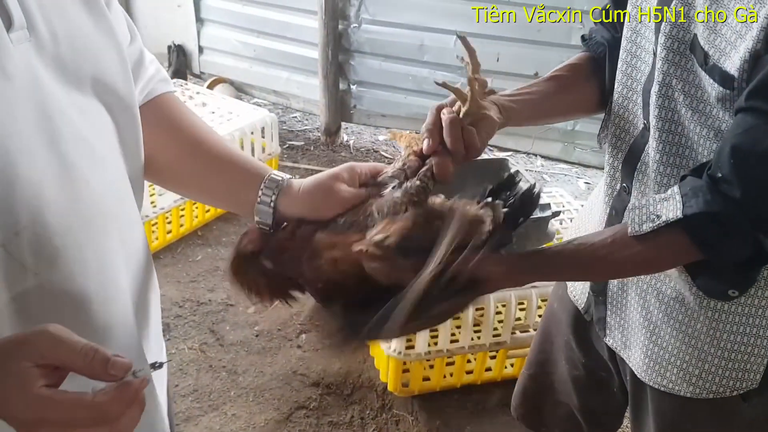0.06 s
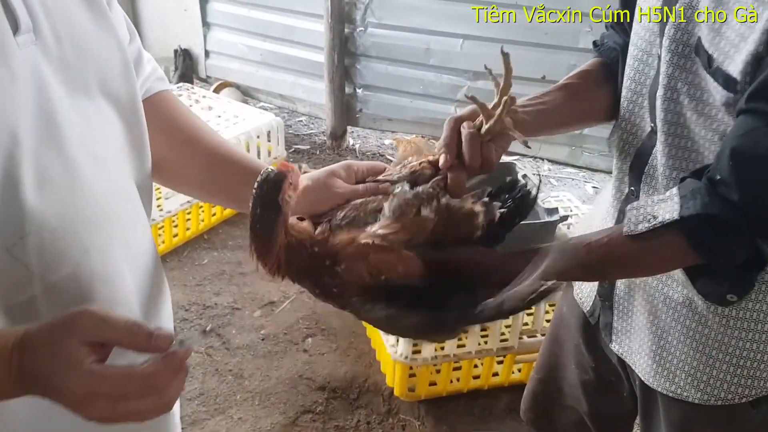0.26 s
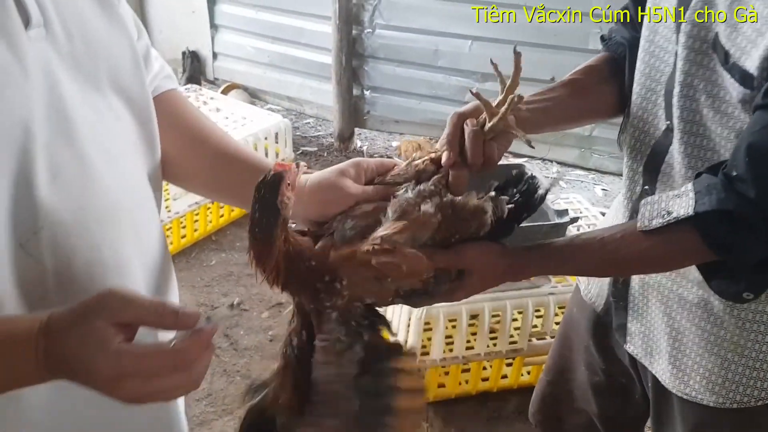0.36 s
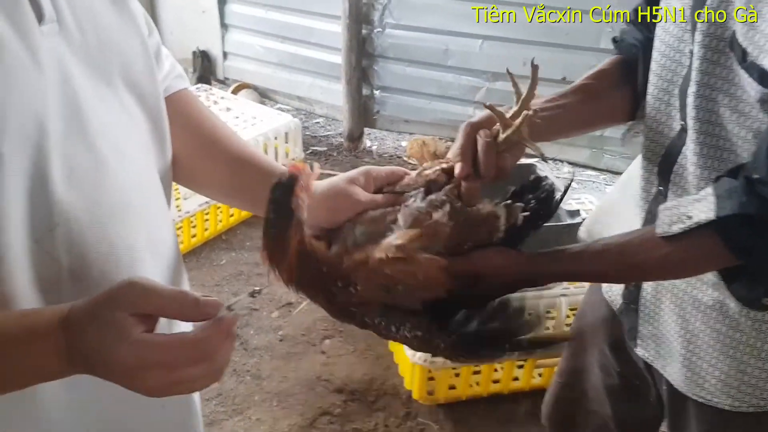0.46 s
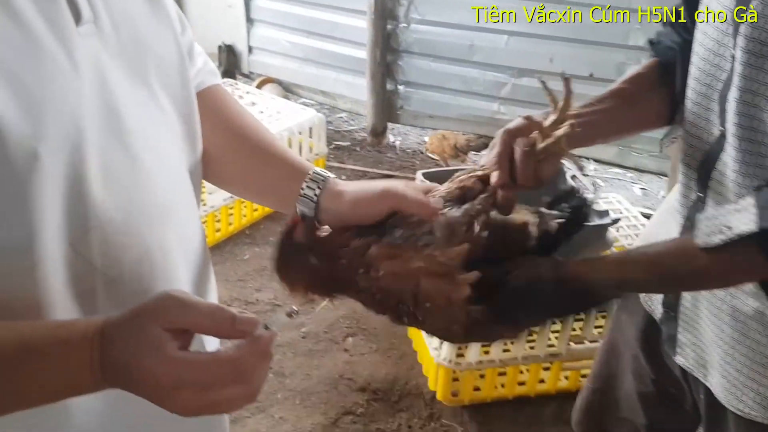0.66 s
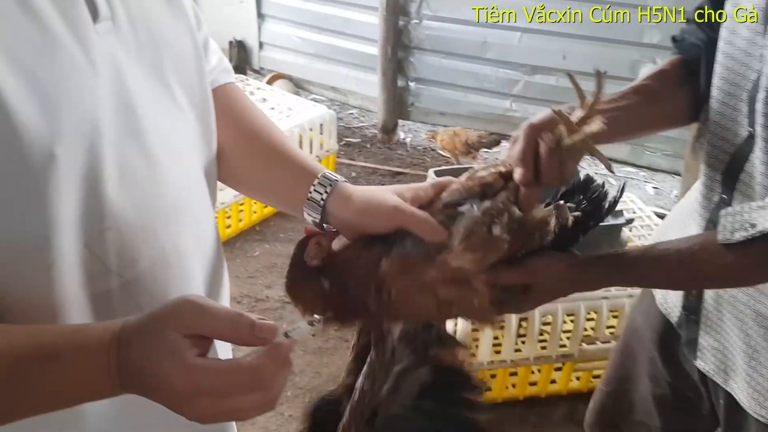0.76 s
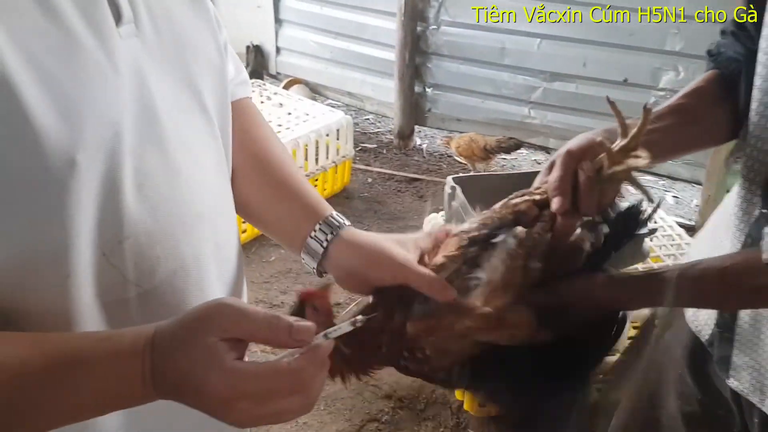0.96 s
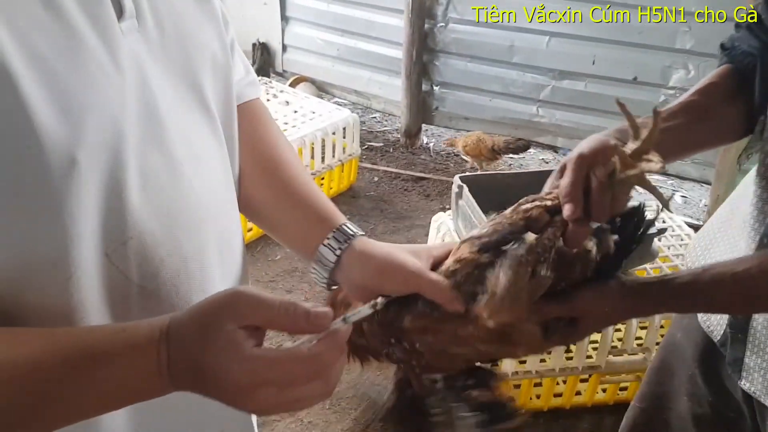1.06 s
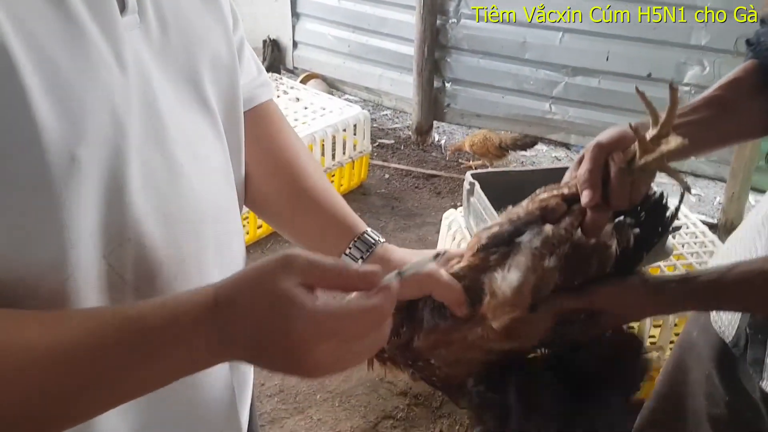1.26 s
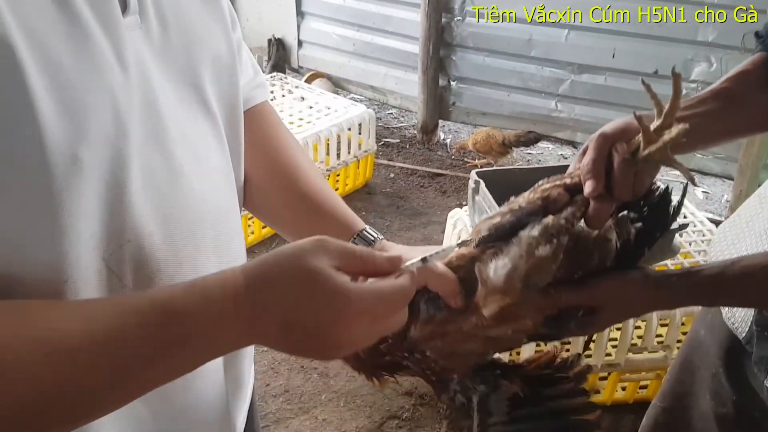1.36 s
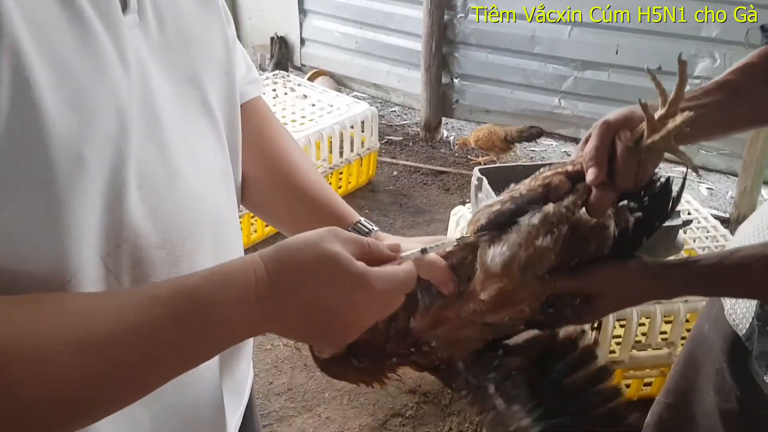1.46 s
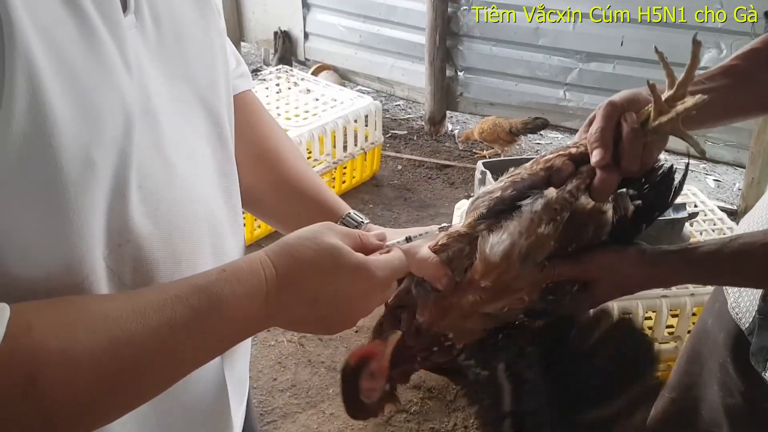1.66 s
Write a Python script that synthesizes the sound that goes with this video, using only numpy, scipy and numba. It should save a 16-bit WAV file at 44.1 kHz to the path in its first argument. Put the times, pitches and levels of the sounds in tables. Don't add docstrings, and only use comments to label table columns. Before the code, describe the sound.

Two harsh, raspy squawks from a restrained hen, with feather flutter and a soft closing cluck

```python
import sys
import numpy as np
from scipy import signal
from scipy.fft import rfft, irfft, next_fast_len
from scipy.io import wavfile
from scipy.ndimage import uniform_filter1d, map_coordinates
from numba import njit

SR = 44100
rng = np.random.default_rng(int(sys.argv[2]) if len(sys.argv) > 2 else 0)


def to_wav(s):
    ch = np.atleast_2d(s).T
    pcm = np.round(np.clip(ch, -1, 1) * 32767)
    wavfile.write(sys.argv[1], SR, pcm.astype(np.int16))


def makeup_ratio(level_db):
    decades = np.asarray(level_db, float) / 20
    return 10 ** decades


N = 74970

# (frequency [Hz], level [dB per Hz])
FAN_RUMBLE = [(21, -36), (35, -5.5), (123, 0.5), (155, -8.5), (188, -3), (217, -13.5), (280, -16),
              (500, -37.5), (650, -69), (1100, -120)]
STEADY_HISS = [(400, -8), (600, -19), (1000, -18), (2000, -18), (3500, -25.5), (5000, -24.5), (8000, -27),
               (16000, -27.5)]
# (frequency [Hz], level [dB per Hz])
INSECT_SONG = [(8000, -26), (8800, -5.5), (9300, 0.5), (10000, -6), (10800, -24.5), (12000, -80.5)]
# (time [s], change of hiss [dB])
FLOCK_SETTLES = [(1.27, 4.5), (1.4, -6), (1.47, -6), (1.52, -1), (1.58, -5.5)]
RUMBLE_DB, HISS_DB, INSECT_DB, LEFT_HISS_DB = -49, -66, -70.5, 1.5

# (time [s], length [s], pitch [Hz], level [dB])
FAR_WHINES = [
    (0, 0.1, 1271, -52),
    (0.115, 0.07, 1247, -65),
    (0.722, 0.072, 1253, -60.5),
    (.785, 0.028, 1400, -61),
    (0.085, 0.039, 1900, -49),
]
# (level over the first [dB]), then (roughness [0-1])
FAR_SECOND_PARTIAL_DB = [0, 3.5, 9.5, 12, -3]
FAR_ROUGHNESS = [.45, .9, .2, .25, .9]
FAR_ROUGHNESS_HZ, FAR_FADE_DB_PER_S = 400, 34.5

# (time [s], rise [s], fall per 20 dB [s], level [dB])
WING_BEATS = [
    (0.099, 0.02703, 0.15, -64),
    (0.169, 0.0182, 1.02, -54.5),
    (.66, 0.044, 0.64, -62),
    (.825, .005, 0.136, -39),
    (0.889, 0.012, 0.31, -47.5),
    (1.281, 0.0078, 0.036, -42.5),
    (1.695, 0.01014, .05, -61.5),
]
# (frequency [Hz], level [dB])
FEATHER_COLOUR = [(150, -30), (400, -9.5), (1500, -0.5), (3000, -2), (6000, -4), (15000, -13.5)]

# (time [s], pitch [Hz], level [dB])
WHISTLE_NOTE = [
    (.172, 2260, -62.5),
    (.19, 2464, -44.5),
    (.21, 2664, -30),
    (0.222, 2697, -31.5),
    (.235, 2560, -47),
]
RINGING_OVERTONE = [(.93, 4360, -55), (.945, 4500, -46), (0.959, 4670, -40), (.975, 4650, -44.5),
                    (1.0, 4530, -51.5), (1.03, 4650, -60)]
SQUEAL_NOTE = [(1.613, 1970, -69), (1.622, 1860, -63), (1.638, 1850, -51), (1.65, 2010, -47.5),
               (1.665, 2130, -53.5), (1.676, 2137, -54), (1.686, 2033, -46), (1.7, 2030, -55)]
WHISTLE_PARTIALS_DB = [-1, -1, -5]
SQUEAL_PARTIALS_DB = [1, -3, -12, -21]
WHISTLE_TOP_DB = -54

# (time [s], peak level [dB])
QUILL_SNAPS = [
    (.1788, -33),
    (.8202, -8),
    (.8222, -23.5),
    (1.2644, -37),
    (1.2758, -23.5),
    (1.2851, -30),
]
# (time [s], level [dB], decay per 60 dB [s], centre [Hz], width [Hz])
TICKS_AND_THUMPS = [(.179, -44, 0.019, 10920, 7810), (.804, -35.5, 0.02, 580, 1100),
                    (.815, -32, 0.061, 470, 1040), (.812, -41.5, 0.076, 180, 120),
                    (.824, -38.5, 0.016, 13000, 6000), (0.29, -46.5, 0.083, 220, 200),
                    (.59, -34.5, 0.089, 304, 510), (.605, -29, 0.22, 1194, 220),
                    (2.3, -52, .06, 3000, 1500), (1.5, -50, .06, 7600, 2500), (.25, -44, .5, 12000, 4300),
                    (0.73, -43, 0.11, 72, 40), (.79, -43.5, 0.083, 97, 50), (1.615, -39.5, .09, 110, 48),
                    (1.53, -43, .09, 105, 41), (.61, -51, .03, 4700, 900), (1.264, -37, 0.025, 460, 870),
                    (1.275, -42, 0.0554, 198.4, 130), (1.1, -43, 0.071, 250, 150),
                    (1.279, -43.5, .014, 12000, 8000), (1.367, -47, .012, 4900, 1300),
                    (1.1, -57.5, 0.007696, 4965, 1197)]

# (time [s], pitch [Hz], level [dB], beak resonance [Hz], throat swell [dB])
FIRST_SQUAWK = [(.218, 881, -40, 2750, -36), (.225, 807.3, -30.5, 3000, -42), (.3, 857.9, -25, 2740, -25),
                (.35, 843.6, -24.5, 2810, -20.5), (.405, 849.3, -14.5, 2700, -15),
                (.47, 786.6, -16, 2524, -12)]
FIRST_BEAK_SHUTS = [(.5, 774.7, -17, 2080, -9), (0.526, 771.7, -17, 1540, -6), (.543, 760, -19, 1410, -10),
                    (.553, 573.7, -20, 1350, -4.5), (0.589, 539, -28, 1230, -6.5),
                    (0.608, 503, -33, 1110, -10.5)]
SECOND_SQUAWK = [(.83, 674.1, -38, 2600, -32), (.876, 713, -25.5, 2870, -35), (.91, 682.2, -29, 2950, -38),
                 (.938, 638.7, -30, 3100, -38.5), (.97, 671.1, -27.5, 3070, -39),
                 (1.0, 666, -25.5, 3010, -34.5), (1.03, 714, -23.5, 3080, -35),
                 (1.075, 723.9, -20, 3250, -34)]
SECOND_BEAK_SHUTS = [(1.1, 808.3, -18, 3260, -15.5), (1.128, 780.3, -17, 2670, -14),
                     (1.14, 639.3, -15, 2000, -10.5), (1.156, 522.2, -21.5, 1466, -9.5),
                     (1.18, 470.8, -22, 1215, -10.5), (1.195, 438, -38, 1120, 1)]
LOW_CLUCK = [(1.483, 224, -53.5, 690, -14), (1.497, 233.3, -42, 674, 1), (1.53, 238.7, -41, 785, -14.5),
             (1.555, 237.4, -57, 692, -24), (1.6, 227.6, -61.5, 686, -13)]
# (ratio to the beak's if under 9, else [Hz], width [Hz], level [dB])
FIRST_TRACT = [(0.728, 610, -11), (1.3, 700, -23.5), (2950, 900, -16.5), (6520, 460, -21), (7250, 500, -21),
               (9250, 560, -28.5), (11720, 1800, -25), (14000, 3500, -24)]
SECOND_TRACT = [(0.681, 650, -11), (0.453, 320, -28), (1.26, 500, -24.5), (2700, 840, -12.5),
                (6200, 730, -21.5), (7300, 460, -23), (8650, 360, -29), (12500, 4200, -22.5)]
CLOSED_TRACT = [(0.657, 140, -4), (1.62, 360, -7.5), (2.55, 360, -14.5), (4010, 610, -19.5)]
# (time [s], roughness [0-1], stumbling [0-1])
HOARSENESS = [(.21, .9, .6), (.29, .8, .6), (.33, .7, .6), (.36, .8, .7), (.41, .65, .8), (.5, .65, .8),
              (.6, .8, .6), (.83, .7, .15), (.87, .58, .25), (.93, .6, .35), (.975, .45, .2),
              (1.02, .65, .45), (1.09, .8, .6), (1.13, .85, .7), (1.2, .85, .6), (1.4, .5, .25)]
# (frequency [Hz], width [Hz], depth [0-1])
THROAT_POCKETS = [(8150, 500, 0.7), (10450, 270, 0.4)]
BEAK_WIDTH, THROAT_WIDTH_HZ = 0.2, 353
THROAT_SAG = 0.95
TILT, SMEAR = 0.5, .7
JITTER, JITTER_HZ, WANDER, WANDER_HZ = .09, 500, .025, 45
SHIMMER_DB, SHIMMER_HZ, UNEVEN_DB, UNEVEN_HZ = 2, 200, 4, 40
STUMBLE, BREATH = 1.3, 1.15

# (frequency [Hz], time to fall 60 dB [s])
SHED_ECHO = [(300, .25), (900, 0.24), (1200, 0.25), (1600, 0.21), (3000, 0.24), (10000, 0.14)]
WET_DB, LEFT_WET_DB = -6.5, 0.5
# (frequency [Hz], level [dB])
LEFT_DIRECT_SOUND = [(500, -0.5), (2000, -2.5), (8000, -14.5)]
# (frequency [Hz], level over the right [dB])
LEFT_PORT = [(60, -14.5), (150, -21.5), (380, -16), (950, -15), (2380, -14.5), (5980, -28), (9500, -8.5),
             (14000, -15)]
RIGHT_DB, TOP_HZ = 4.5, 15700


def unit(x):
    return x / np.sqrt(np.mean(x ** 2) + 1e-20)


def along(points, hz):
    f, v = np.transpose(points)
    return np.interp(np.log(hz + 1), np.log(f + 1), v)


def wobble(rate, n=N):
    knots = rng.standard_normal(int(n * rate / SR) + 4)
    return map_coordinates(knots, [np.arange(n) * rate / SR])


def filtered(x, response):
    m = next_fast_len(N + SR // 2)
    return irfft(rfft(x, m) * response(np.fft.rfftfreq(m, 1 / SR)), m)[..., :N]


def noise(spectrum):
    white = rng.standard_normal((2, N))
    return unit(filtered(white, lambda f: makeup_ratio(along(spectrum, f)) * (f > spectrum[0][0])))


@njit
def resonate(x, hz, width_hz, sr):
    y = np.zeros(len(x))
    for i in range(2, len(x)):
        r = np.exp(-np.pi * width_hz[i] / sr)
        drive = (1 - r * r) / 2 * (x[i] - x[i - 2])
        y[i] = drive + 2 * r * np.cos(2 * np.pi * hz[i] / sr) * y[i - 1] - r * r * y[i - 2]
    return y


def add(track, s, x):
    part = track[max(round(s * SR), 0):][:len(x)]
    part += x[:len(part)]


def fan_rumble():
    shared, left_only = noise(FAN_RUMBLE) * makeup_ratio(RUMBLE_DB + 2.3 * wobble(18))
    return np.array([shared + .6 * left_only, shared])


def insect_hiss():
    settling_db = np.interp(np.arange(N) / SR, *np.transpose(FLOCK_SETTLES))
    hiss = noise(STEADY_HISS) * makeup_ratio(HISS_DB + settling_db + wobble(4.5))
    hiss = hiss + noise(INSECT_SONG) * makeup_ratio(INSECT_DB + 1.5 * wobble(25))
    return hiss * makeup_ratio([[LEFT_HISS_DB], [0]])


def far_hen():
    out = np.zeros(N)
    for (s, length, hz, db), second_db, rough in zip(FAR_WHINES, FAR_SECOND_PARTIAL_DB, FAR_ROUGHNESS):
        t = np.arange(0, length, 1 / SR)
        n = len(t)
        phase = 2 * np.pi * hz * np.cumsum(1 + 0.0058 * wobble(37.5, n)) / SR
        rise = np.clip((t + (s < .01)) / 0.013, 0, 1)
        fall = np.clip((length - t) / 0.017, 0, 1)
        level = makeup_ratio(db - FAR_FADE_DB_PER_S * t + 1.25 * wobble(47, n))
        second = makeup_ratio(second_db) * (1 + rough * wobble(FAR_ROUGHNESS_HZ, n)) * np.sin(2 * phase)
        add(out, s, rise * fall * level * (np.sin(phase) + second))
    return out


def wing_flaps():
    clock = np.arange(N) / SR
    beats = np.zeros(N)
    for s, rise, fall, db in WING_BEATS:
        drop = np.where(clock < s, ((s - clock) / rise) ** 2, (clock - s) / fall)
        beats += makeup_ratio(db - 20 * drop)
    return beats * makeup_ratio(2.5 * wobble(300)) * noise(FEATHER_COLOUR)[0]


def clear_note(rows, partials_db, top_db=0):
    s, hz, db = np.transpose(rows)
    t = np.arange(s[0], s[-1], 1 / SR)
    n = len(t)
    phase = 2 * np.pi * np.cumsum(np.interp(t, s, hz) * (1 + 0.008 * wobble(220, n))) / SR
    level_db = np.interp(t, s, db)
    tones = np.zeros(n)
    for k, partial_db in enumerate(partials_db):
        capped_db = np.minimum(level_db, top_db if k else 0)
        tones += makeup_ratio(partial_db + capped_db + 1.6 * wobble(91, n)) * np.sin((k + 1) * phase)
    return tones * makeup_ratio(5) * np.clip((t - s[0]) / 0.0084, 0, 1)


def quill_snaps():
    out = np.zeros(N)
    click = np.diff([0, 0, 0, 0, 1, 0, 0, 0, 0], n=3) / 3
    for s, db in QUILL_SNAPS:
        add(out, s, makeup_ratio(db) * click)
    return out


def ticks_and_thumps():
    out, t = np.zeros(N), np.arange(SR // 8) / SR
    for s, db, decay, hz, width_hz in TICKS_AND_THUMPS:
        ring = rng.standard_normal(len(t))
        for _ in range(2):
            ring = unit(resonate(ring, hz + 0 * t, width_hz + 0 * t, SR))
        add(out, s, makeup_ratio(db - 60 * t / decay) * ring)
    return out


def cry(rows, tract):
    s, *cols = np.transpose(rows)
    t = np.arange(s[0], s[-1] + 0.016, 1 / SR)
    n = len(t)
    hz, db, beak, swell_db = [np.interp(t, s, c) for c in cols]
    when, rough, stumble = np.transpose(HOARSENESS)
    rough = np.interp(t, when, rough) ** 2
    stumble = np.interp(t, when, stumble)

    def each_partial():
        return np.array([wobble(UNEVEN_HZ, n) for _ in k])

    def band(x, centre, width):
        centre, width = centre + 0 * t, width + 0 * t
        return resonate(resonate(x, centre, width, SR), centre, width, SR)

    def even(x):
        return x / np.sqrt(abs(uniform_filter1d(x * x, size=1300)) + 1e-9)

    pitch_error = JITTER * wobble(JITTER_HZ, n) + WANDER * wobble(WANDER_HZ, n)
    phase = 2 * np.pi * np.cumsum(hz * (1 + rough * pitch_error)) / SR
    k = np.arange(1, 30)[:, None]
    strength = k ** -TILT * (k * hz < 16000) * makeup_ratio(UNEVEN_DB * each_partial())
    steady = unit((strength * np.cos(k * phase + SMEAR * each_partial())).sum(0))
    second_beat = .6 * wobble(30, n) * np.cos(phase / 2)
    third_beat = (.8 + .5 * wobble(30, n)) * np.cos(phase / 3)
    pulses = steady * (1 + STUMBLE * stumble * (second_beat + third_beat))
    breath = unit(rng.standard_normal(n) * (2 + np.cos(phase)))
    shimmer = makeup_ratio(SHIMMER_DB * np.sqrt(rough) * wobble(SHIMMER_HZ, n))
    source = (pulses + BREATH * rough * breath) * shimmer
    airy = source + 2 * breath * shimmer

    main = unit(band(source, beak, 2 * BEAK_WIDTH * beak))
    upper = np.zeros(n)
    for place, width_hz, gain_db in tract:
        if place < 9:
            ring = band(source, place * beak, width_hz)
        else:
            ring = band(airy, place, width_hz)
        upper += makeup_ratio(gain_db) * unit(ring)
    throat = even(band(2 * steady + source, THROAT_SAG * hz, THROAT_WIDTH_HZ))
    voice = even(main + upper) + makeup_ratio(swell_db + UNEVEN_DB / 2 * wobble(UNEVEN_HZ, n)) * throat
    return voice * makeup_ratio(db) * np.clip((s[-1] + 0.018 - t) / 0.014, 0, 1)


def held_hen():
    out = np.zeros(N)
    add(out, WHISTLE_NOTE[0][0], clear_note(WHISTLE_NOTE, WHISTLE_PARTIALS_DB, WHISTLE_TOP_DB))
    add(out, FIRST_SQUAWK[0][0], cry(FIRST_SQUAWK + FIRST_BEAK_SHUTS, FIRST_TRACT))
    add(out, SECOND_SQUAWK[0][0], cry(SECOND_SQUAWK + SECOND_BEAK_SHUTS, SECOND_TRACT))
    add(out, RINGING_OVERTONE[0][0], clear_note(RINGING_OVERTONE, [0]))
    add(out, LOW_CLUCK[0][0], cry(LOW_CLUCK, CLOSED_TRACT))
    add(out, SQUEAL_NOTE[0][0], clear_note(SQUEAL_NOTE, SQUEAL_PARTIALS_DB))

    def pockets(f):
        left_over = np.ones(len(f))
        for hz, width_hz, depth in THROAT_POCKETS:
            left_over *= 1 - depth * np.exp(-((f - hz) / width_hz) ** 2)
        return left_over

    return filtered(out, pockets)


def shed_echo(x):
    hz, t, z = signal.stft(rng.standard_normal((2, SR // 2)), SR, nperseg=256)
    fading = z * makeup_ratio(-60 * t / along(SHED_ECHO, hz)[:, None])
    tail = signal.istft(fading, SR, nperseg=256)[1]
    tail = tail / np.linalg.norm(tail[0])
    return signal.fftconvolve(np.pad(x, (250, 0))[None], tail, axes=1)[:, :N]


def scene():
    background = fan_rumble() + insect_hiss()
    birds = far_hen() + wing_flaps() + quill_snaps() + ticks_and_thumps() + held_hen()
    left = filtered(birds, lambda f: makeup_ratio(along(LEFT_DIRECT_SOUND, f)))
    echo = makeup_ratio([[WET_DB + LEFT_WET_DB], [WET_DB]]) * shed_echo(birds)
    return np.array([left, birds]) + echo + background


def top_cut(x):
    return signal.sosfilt(signal.butter(12, 16990, fs=SR, output="sos"), x)


def record(dry):
    def port_response(f):
        ports = np.array([makeup_ratio(along(LEFT_PORT, f)), np.ones(len(f))])
        return makeup_ratio(RIGHT_DB) * ports * np.where(f < TOP_HZ, 1, .06)

    ports = filtered(dry, port_response)
    mix = ports / (1 + abs(ports) ** 8) ** (1 / 8)
    return top_cut(mix)


dry = scene()
out = record(dry)
to_wav(out)
```